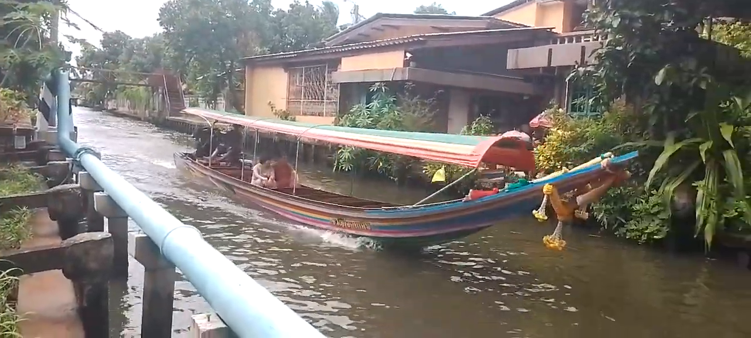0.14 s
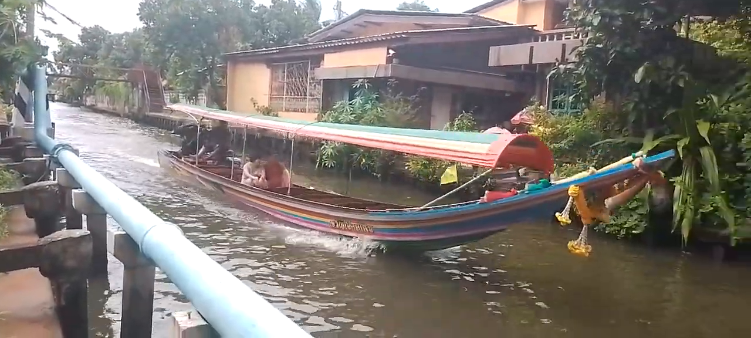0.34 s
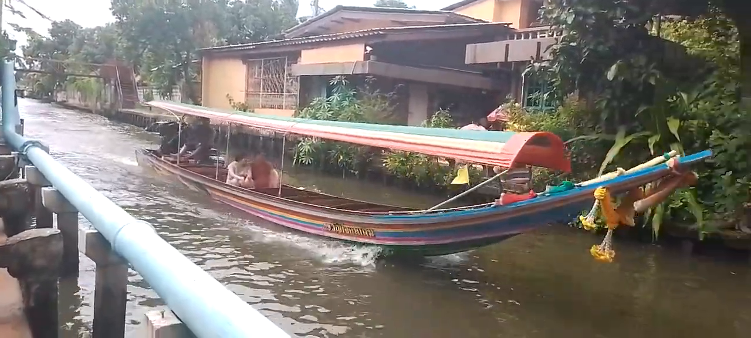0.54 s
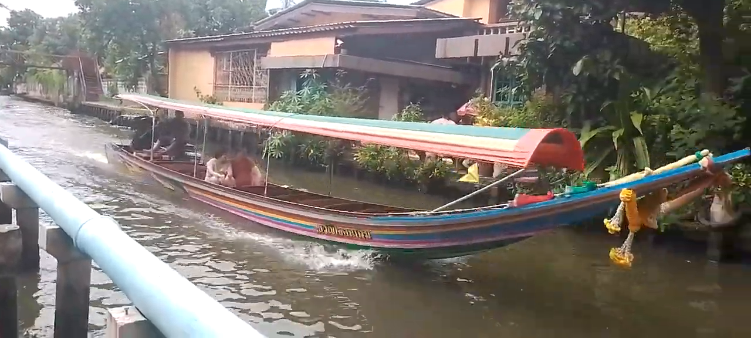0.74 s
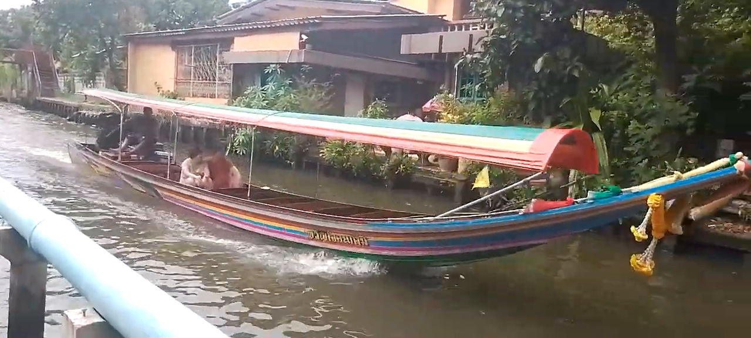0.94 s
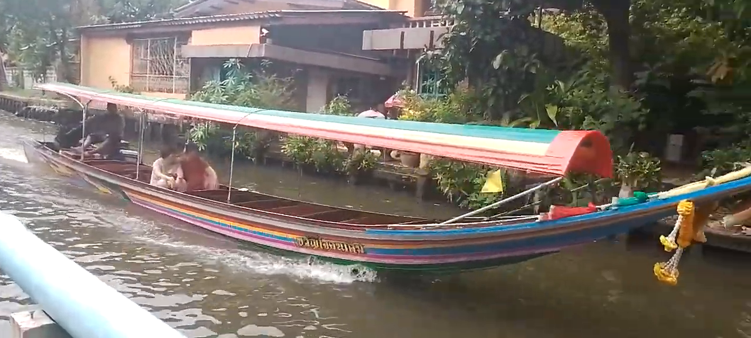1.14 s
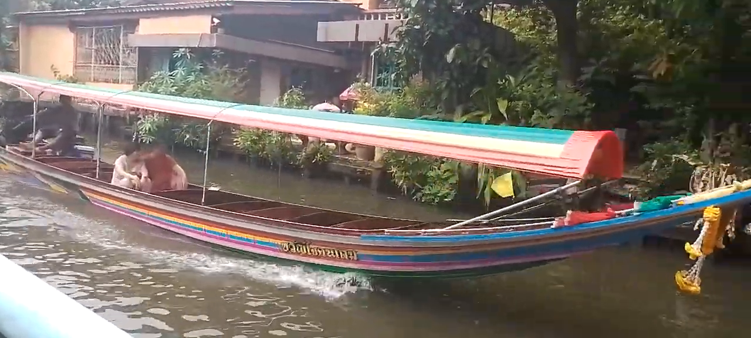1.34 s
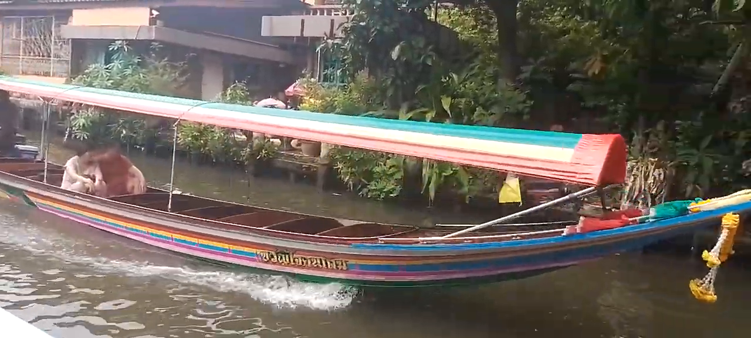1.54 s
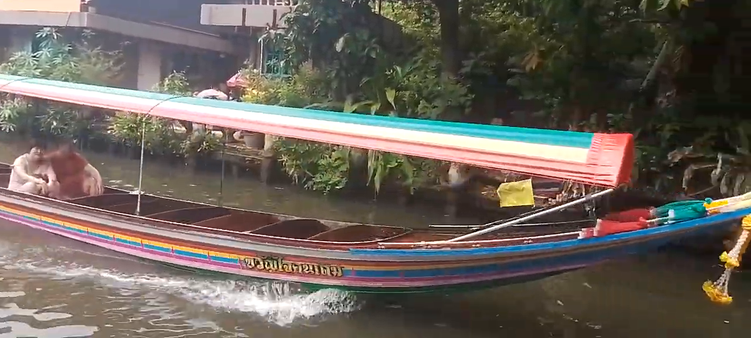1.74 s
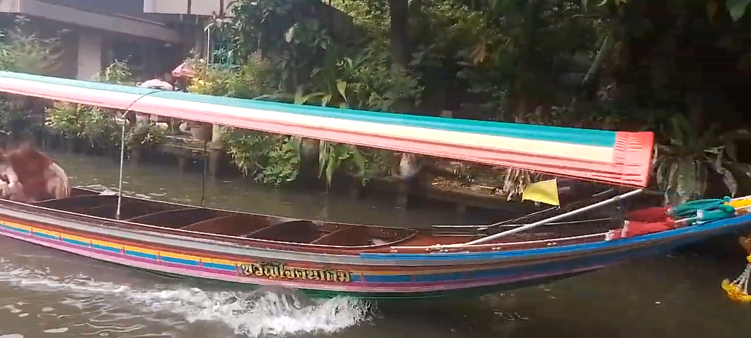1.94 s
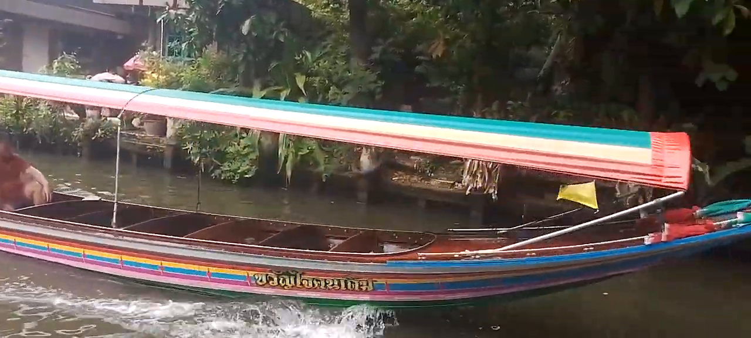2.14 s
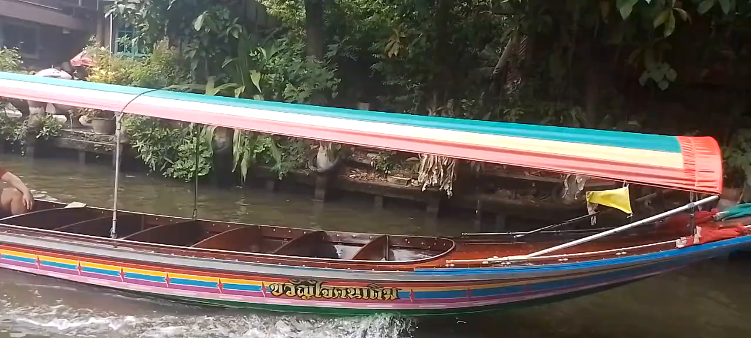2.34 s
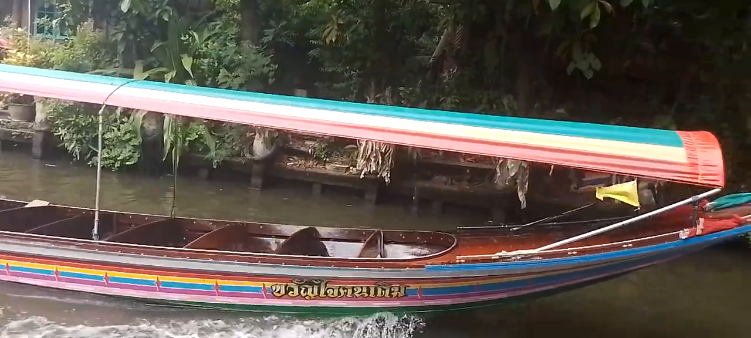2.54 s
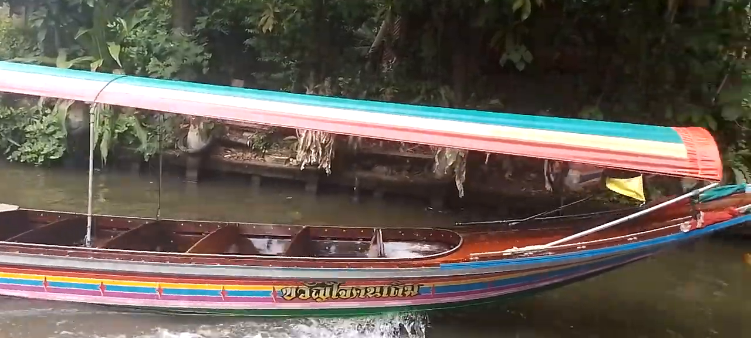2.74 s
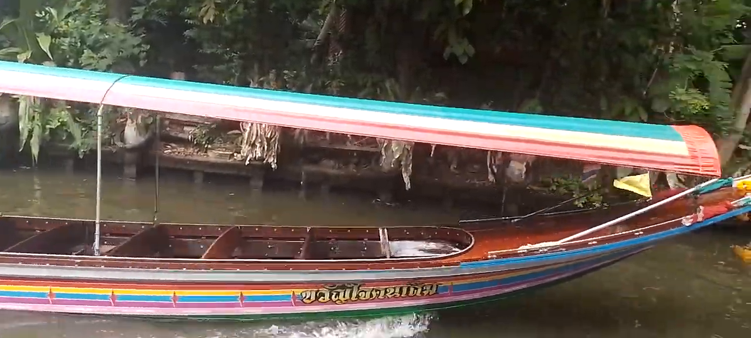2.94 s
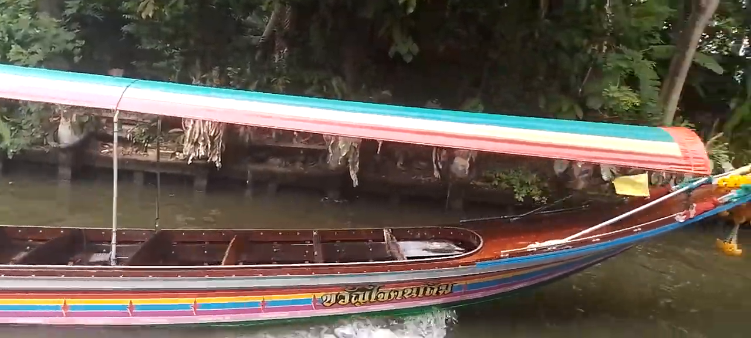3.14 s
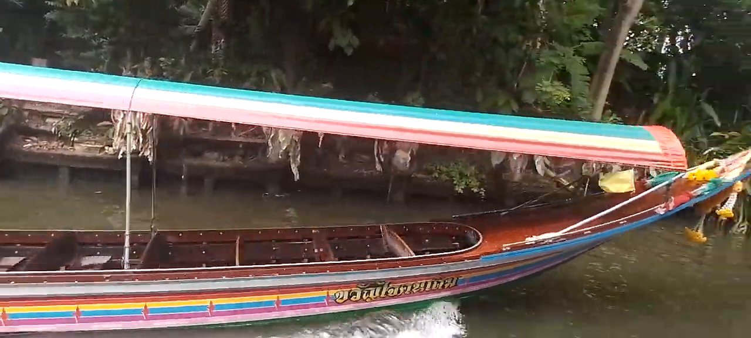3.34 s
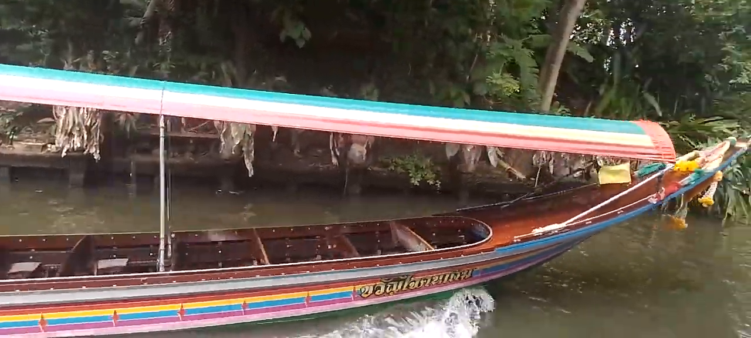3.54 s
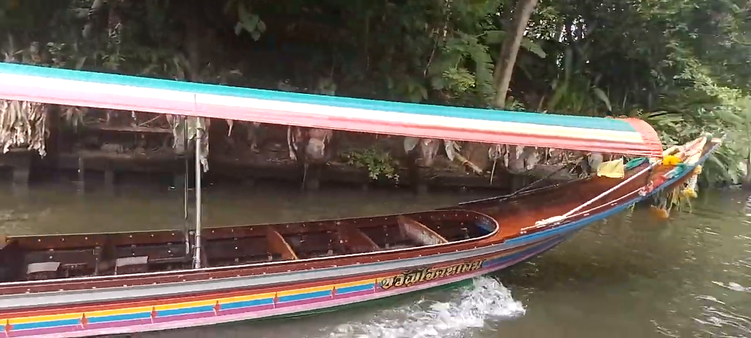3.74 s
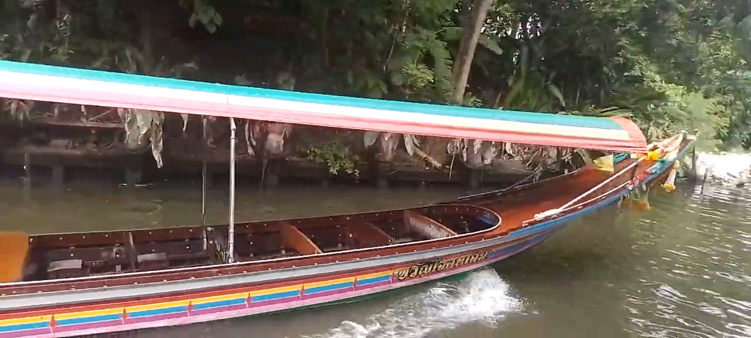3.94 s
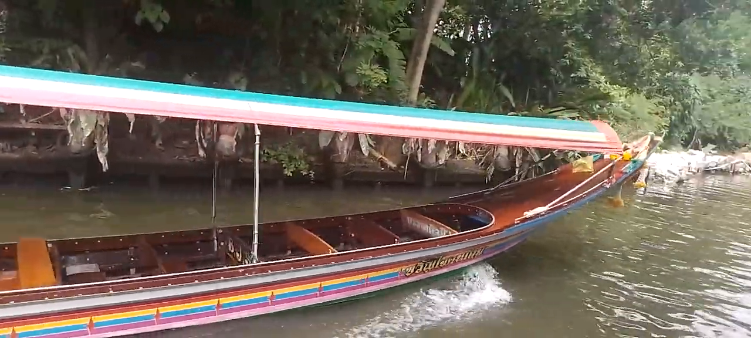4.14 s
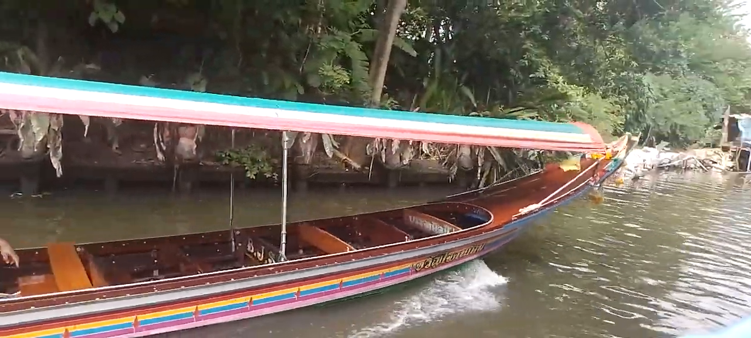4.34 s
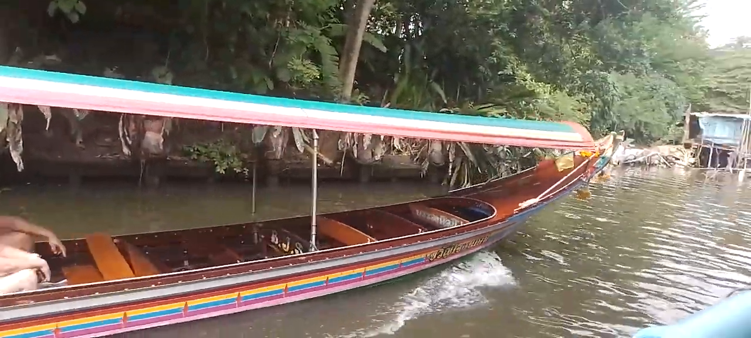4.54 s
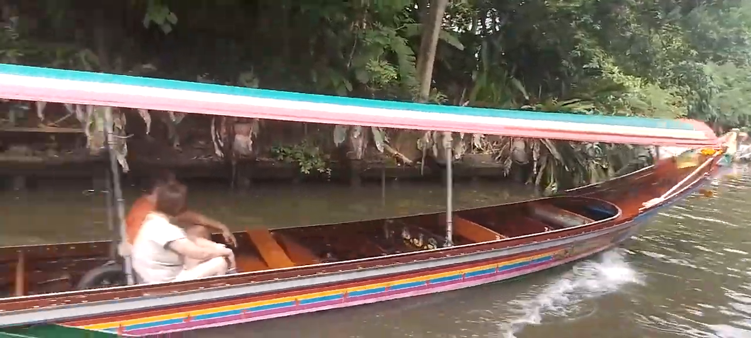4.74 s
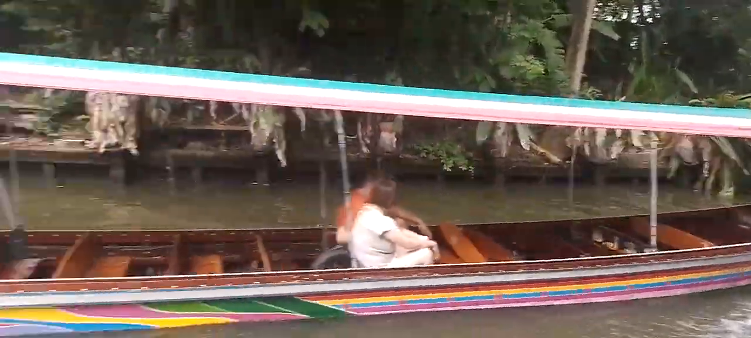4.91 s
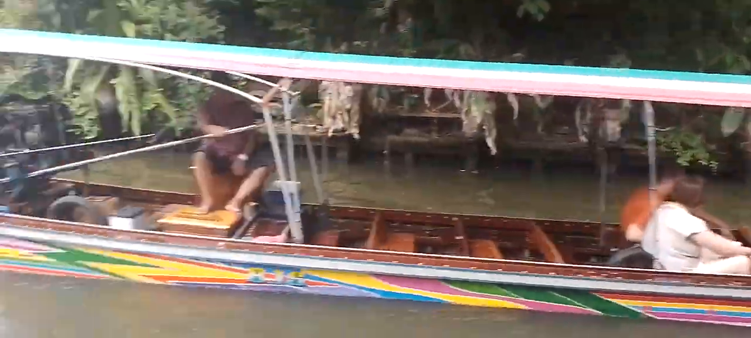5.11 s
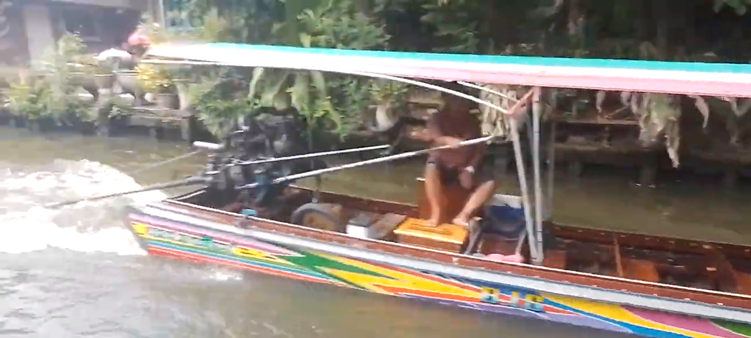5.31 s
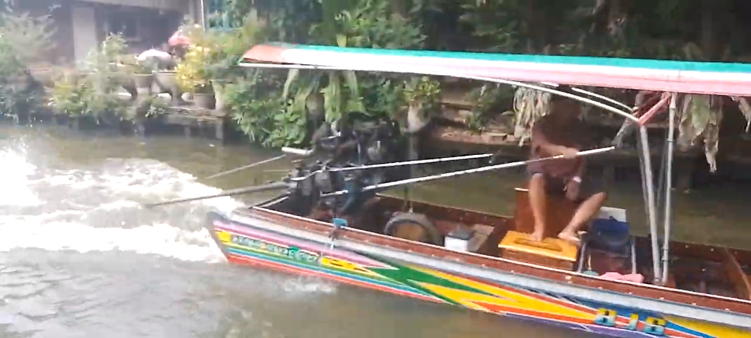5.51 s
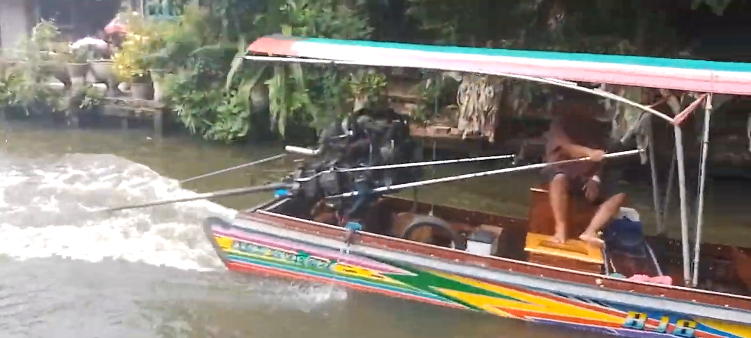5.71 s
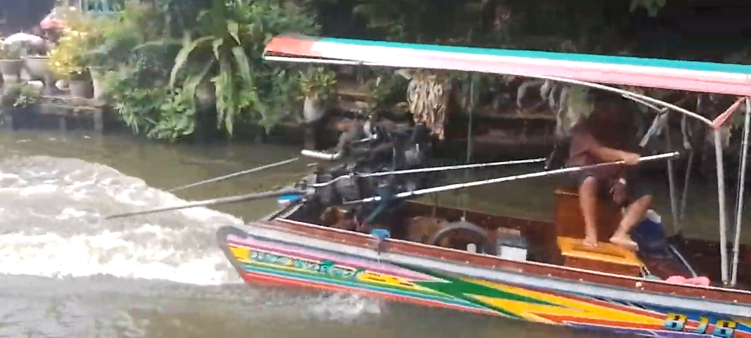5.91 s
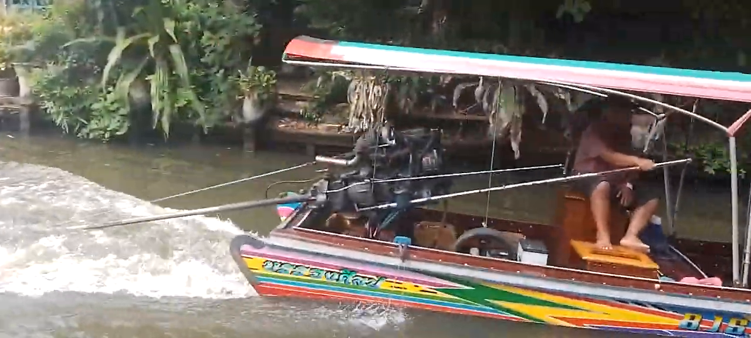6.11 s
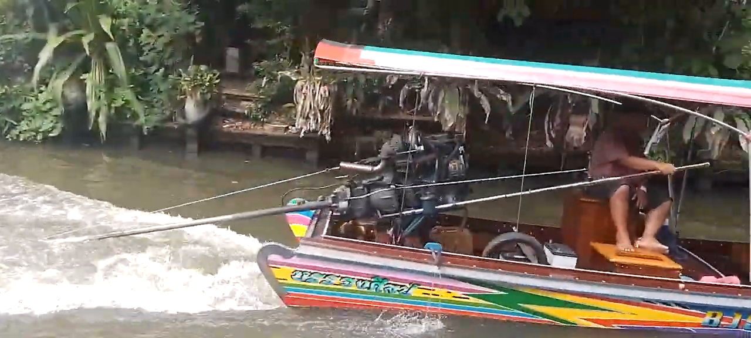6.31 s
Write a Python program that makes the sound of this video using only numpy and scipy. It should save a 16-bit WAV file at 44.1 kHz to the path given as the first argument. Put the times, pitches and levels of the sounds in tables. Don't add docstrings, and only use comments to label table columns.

```python
import sys
import numpy as np
from scipy import signal
from scipy.fft import rfft, irfft, next_fast_len
from scipy.io import wavfile
from scipy.ndimage import uniform_filter1d, map_coordinates

SR = 44100
rng = np.random.default_rng(int(sys.argv[2]) if len(sys.argv) > 2 else 0)


def amplitude_ratio(level_db):
    exponent = np.asarray(level_db, float) / 20
    return 10 ** exponent


def inscribe(sig):
    pcm = np.round(np.clip(np.atleast_2d(sig).T, -1, 1) * 32767)
    wavfile.write(sys.argv[1], SR, pcm.astype(np.int16))


N = 285327
TIME = np.arange(N) / SR

# frequency in Hz, width in Hz, gain in dB.
PIPE = [(225, 100, 1), (329, 100, 6.5), (388, 48, -5)]
# frequency in Hz, width in Hz, gain in dB.
SILENCER = [(841, 320, 8), (1004, 300, 8), (1158, 120, 4.5), (496, 110, -3)]
# frequency in Hz, width in Hz, gain at the first glimpse in dB,
# left and right gain while nearing in dB, left and right gain once alongside in dB.
PARTS = [(562, 240, 1.5, 2.5, 0.5, 0.5, -0.5), (874, 167, 1.5, 1, -10, 0, -5),
         (1282, 266, 0, 2.5, 6.5, 2.5, -0.5), (1628, 253, 2, 3, -0.5, -1.5, -1),
         (2220, 480, -1, 3.5, -0.5, -0.5, 2.5), (2894, 190, 1, 7.5, 6, 3.5, 2.5),
         (3750, 720, 0.5, 1, -2.5, 2.5, 0.5), (4445, 94, 5.5, 1.5, 0.5, -65, -2),
         (4880, 450, 1, -3, -7, -3, -11), (5310, 860, -0.5, -6, -7, -12, -14)]
# frequency in Hz, gain in dB.
LEFT_PORT = [(60, -91), (500, -24), (2500, -17.5), (4500, -17), (5850, -9), (6600, -4.5), (7500, -2.5),
             (7900, -7.5), (8500, -13), (9500, -21), (11000, -25), (15000, -20), (16000, -17.5)]
# frequency in Hz, gain in dB.
RIGHT_PORT = [(60, -64), (500, -17.5), (2500, -12), (4500, -10), (6500, -14.5), (8000, -6), (9300, -3.5),
              (10400, -1), (11300, -5.5), (12500, -9), (14000, -14), (16000, -21)]
# time in seconds, frequency in Hz,
# gain over the port colour in dB.
CREST = [(0, 6690, 6), (.5, 7160, 1.5), (1.0, 7090, 3), (1.5, 6910, 8.5), (1.9, 7230, 6), (2.6, 7020, 6),
         (3.2, 7320, 4.5), (3.8, 7390, 5.5), (4.3, 6970, 1.5), (6.47, 7120, 5)]
# time in seconds, delay of the left port in ms.
LAG = [(0, .14), (1.2, .2), (1.8, .45), (3, .52), (4.8, .55), (5.2, .1), (6, .02), (6.47, 0.)]
# time in seconds, left port over right for the engine in dB.
FACING = [(0, -5.5), (2, -3.5), (3.6, 1.5), (4.7, 3), (5.2, 3), (6.47, 0.5)]
# time in seconds, share 0-1.
ALONGSIDE = [(0, 0.), (4.85, 0.), (5.25, 1.), (6.47, 1.)]
# frequency in Hz, gain in dB.
CANAL = [(12, -45), (20, -50), (70, -9.5), (157, -21.5), (208, -0.5), (250, 1), (358, 6), (480, -2),
         (620, -19), (1060, -120)]
# delay in ms, gain as a factor.
BANKS = [(7, .8), (12.5, -.75), (19, .7), (25.5, -.55)]
# start in seconds, length in seconds, left delay in ms,
# right delay in ms, strength 0-1.
ECHOES = [
    (0, .6, 2.03, 1.9, .2),
    (0, 3, .6, 1.2, .09),
    (3.15, .95, .6, 1.155, .2),
    (4.93, .53, 2.52, 2.2, .5),
    (5.6, .9, 2.28, 2.04, .1),
]
# time in seconds, frequency in Hz, depth 0-1.
HULL_GAP = [(0, 2840, 0), (4.7, 2920, 0.68), (4.95, 2920, 0.6), (5.1, 2310, 0.65), (5.35, 2350, 0.65),
            (5.5, 2300, 0.16), (6.47, 2370, 0.51)]
# time in seconds, frequency in Hz, depth 0-1.
RING_GAP = [(0, 950, 0.5), (4.2, 970, 0.02), (4.4, 990, 0.7), (5.0, 980, 1), (5.2, 770, 0.5),
            (5.35, 740, 0.24), (6.47, 694, 0.33)]
# time in seconds, crank speed in turns/s.
REVS = [(0, 31.1), (.3, 32.1), (.65, 33.6), (1.1, 33.55), (1.4, 32.3), (1.7, 30.4), (2.0, 29.74),
        (2.65, 29.15), (3.3, 29.1), (3.6, 30), (4.0, 31.1), (4.8, 36.93), (5.2, 41.35), (5.5, 43.4),
        (5.8, 44.12), (6.1, 43.25), (6.47, 41.75)]
# time in seconds, load throb in dB, pipe mouth opening in dB.
EXHAUST = [(0, -74, -63), (.4, -65, -58.5), (1.15, -75, -72), (1.62, -70, -59), (1.74, -69, -41.5),
           (2.9, -79, -41), (3.2, -81, -46), (3.45, -71.5, -43), (3.62, -69, -49.5), (4.05, -66, -43),
           (4.22, -63, -47), (4.4, -64, -42), (4.7, -61, -50), (5.2, -52, -36), (5.6, -54.5, -43.5),
           (6.47, -57, -40)]
# start in seconds, length in seconds, level in dB.
SURGES = [
    (0.137, 0.099, -52),
    (0.966, 0.084, -53),
    (4.196, 0.12, -39),
    (4.414, 0.11, -39),
    (5.213, 0.12, -29),
    (5.691, 0.079, -34),
    (5.796, 0.13, -38),
    (6.067, 0.15, -31),
    (6.238, 0.072, -34),
    (6.37, 0.05, -50),
]
# time in seconds, then 8th, 9th, 10th, 11th and 13th order in dB.
HUM = [(0, -90, -98, -90, -90, -90), (1.6, -70, -78, -64, -72, -76), (1.77, -53, -52.5, -54, -62, -60),
       (1.88, -60, -70, -65, -53, -72), (2.19, -54, -60, -48, -61, -63), (2.38, -51, -66, -47, -60, -56),
       (2.47, -50, -62, -53, -52, -55), (2.55, -68, -61, -57, -43, -48), (2.72, -58, -60, -75, -55, -68),
       (2.8, -52.5, -50, -62, -47, -49), (2.96, -51.5, -51, -49, -48, -73),
       (3.12, -52, -57, -47, -46.5, -68), (3.2, -53, -49, -52, -59, -72), (3.46, -51, -62, -46.5, -63, -71),
       (3.82, -58, -59, -55, -52, -69), (4.02, -56, -50, -48, -69, -74), (4.3, -79, -77, -85, -80, -85),
       (6.47, -90, -90, -90, -90, -90)]
# start in seconds, peak in dB, frequency in Hz.
POPS = [(5.2, -28, 351), (5.223, -22, 347), (5.254, -27, 313), (5.297, -22.5, 272), (5.665, -30, 264),
        (5.688, -31, 315), (5.713, -18, 264), (5.756, -22, 281), (5.779, -32, 313), (5.843, -22, 354),
        (5.891, -19, 254), (6.024, -24, 316), (6.075, -15, 282), (6.097, -11, 304), (6.12, -30, 343),
        (6.163, -15.5, 280), (6.212, -22, 335), (6.257, -22, 438), (6.257, -18, 270), (6.329, -29, 260),
        (6.379, -23, 317), (6.425, -22.5, 299)]
# time in seconds, left and right level at the port peaks in dB per Hz.
WAVES = [(0, -71, -76.5), (.2, -66.5, -74.5), (.9, -65.5, -72), (1.5, -64.5, -71.5), (2.1, -61.5, -71),
         (2.8, -61, -70), (3.5, -65.5, -68.5), (3.9, -65.5, -65.5), (4.25, -61, -61), (4.45, -58.5, -59.5),
         (4.84, -58, -58.5), (4.92, -46.5, -52.5), (5.45, -52.5, -59.5), (5.7, -57, -63.5),
         (6.15, -57, -63), (6.47, -51.5, -57.5)]
# start in seconds, length in seconds, left and right level in dB per Hz.
GUSHES = [
    (4.919, 0.023, -53.5, -53),
    (5.027, 0.024, -40.5, -54),
    (5.074, 0.071, -46, -53),
    (5.166, 0.15, -47.5, -56),
    (5.267, 0.085, -51, -55.5),
    (5.368, 0.11, -47.5, -56),
    (5.548, 0.0052, -52, -74),
]
# time in seconds, gain in dB.
BREADTH = [(0, 4.5), (1.5, 2.5), (2.8, 0), (3.4, 1), (4.75, -4), (4.88, -7.5), (5.0, -2), (5.35, -1),
           (5.7, 5.5), (6.1, 7), (6.47, 3.5)]
# start in seconds, peak in dB, left over right in dB.
SPLASHES = [(0.1413, -20, 19), (0.2034, -34, 11.5), (0.5726, -22, 14), (0.6619, -34, 10.5),
            (1.275, -38, 18), (1.377, -20.5, 10.5), (1.435, -26, 14), (1.4975, -23, 14.5),
            (1.8342, -30, 13.5), (1.9584, -27, 15.0), (2.1316, -34, 15), (2.267, -21, 22),
            (2.3366, -30, 11), (2.3685, -20, 15.5), (2.5716, -24, 14.0), (2.641, -18, 16),
            (2.9841, -23, 13.5), (3.155, -22, 13), (3.2216, -23, -4), (3.422, -23, 3), (3.4979, -32, 4.5),
            (4.0228, -18, -2), (4.2097, -19.5, -10), (4.3595, -36, -3.5), (4.391, -24, -8),
            (4.6204, -28, 4), (5.0747, -13, 9), (5.1241, -7, 10), (5.174, -31, 6), (5.2174, -7, 6),
            (5.2663, -8, 2), (5.2915, -6, 5), (5.3617, -5.5, 7), (5.4123, -1, 12), (5.4533, -6, 5),
            (5.5458, -17, 6), (6.1135, -11.5, 13)]
# start in seconds, peak in dB, frequency in Hz, decay in seconds.
SLAPS = [
    (2.435, -51, 1720, .012),
    (2.502, -45, 1780, .012),
    (2.52, -53, 1700, .03),
    (2.638, -46, 1790, .011),
    (2.774, -50, 1820, .01),
    (2.795, -44.5, 1690, 0.04),
    (2.922, -49, 1670, .02),
    (3.0507, -47.5, 1780, .014),
    (3.1645, -53, 1690, .015),
]
# time in seconds, left and right share per kHz.
CHOKE = [(0, 0, 0), (4.35, 0, 0), (4.5, .03, .3), (4.75, .03, 1.5), (4.86, .1, 2), (4.93, .55, 3),
         (5.18, .8, 3), (5.22, .08, .2), (5.5, .08, .25), (5.62, .08, 2), (5.84, .05, 1.5), (5.9, .05, .2),
         (6.08, .05, .2), (6.15, .08, 1.5), (6.47, .08, 1)]

BOAT_M_PER_S, PASS_M, PASS_S = 4.54, 3.69, 5.913
HUM_S, HUM_FOR_S = 1.75, 2.3
SURGE_RISE_S, SURGE_FALL_S = 0.03, 0.015
GUSH_RISE_S, GUSH_FALL_S = 0.0048, 0.0069
ECHO_FADE_S = 0.1


def evened(x):
    return x / np.sqrt(np.mean(x ** 2) + 1e-20)


def decibels(power):
    return 10 * np.log10(abs(power) + 1e-14)


def columns(rows):
    s, *values = np.transpose(rows)
    return np.array([np.interp(TIME, s, v) for v in values])


def hold(start_s, length_s, rise_s, fall_s):
    early_s = np.maximum(start_s - TIME, 0)
    late_s = np.maximum(TIME - start_s - length_s, 0)
    return np.exp(-(early_s / rise_s) ** 2 - late_s / fall_s)


def drift(seconds):
    size = max(round(seconds * SR), 2)
    return evened(uniform_filter1d(uniform_filter1d(rng.standard_normal(N), size), size))


def colour(x, points):
    f, db = np.transpose(points)
    size = next_fast_len(N)
    hz = np.fft.rfftfreq(size, 1 / SR)
    gain_db = np.interp(np.log(hz + 1), np.log(f + 1), db)
    return irfft(rfft(x, size) * amplitude_ratio(gain_db), size)[:N]


def ring(x, hz, width_hz):
    b, a = signal.iirpeak(hz, hz / width_hz, SR)
    return signal.lfilter(b, a, signal.lfilter(b, a, x))


def notch(x, hz, width_hz, depth):
    turn = np.exp(2j * np.pi * np.cumsum(hz) / SR)
    r = np.exp(-np.pi * width_hz / SR)
    band = 2 * (turn * signal.lfilter([1 - r], [1, -r], x / turn)).real
    return x - np.clip(depth, 0, 1) * band


def later(x, ms):
    return map_coordinates(x, [np.round(np.arange(N) - ms * SR / 1000)], order=1, mode="nearest")


def ports(x, share=1):
    return np.array([later(x, share * columns(LAG)[0]), x])


def near_db():
    return -10 * np.log10(1 + (BOAT_M_PER_S * (TIME - PASS_S) / PASS_M) ** 2)


def astern_db(db):
    return db * columns(ALONGSIDE)[0] ** 3 + 5.5 * np.maximum(TIME - PASS_S, 0)


def clear_db(db):
    return db * hold(4.415, 0.19, rise_s=0.047, fall_s=0.26)


def canal():
    a, b = (evened(colour(rng.standard_normal(N), CANAL)) for _ in range(2))
    level_db = -38.5 + 1.32 * near_db() + astern_db(0.5)
    return amplitude_ratio(level_db) * (ports(a, 0.19) + 0.18 * np.array([b, -b]))


def slaps():
    out, t = np.zeros(N), np.arange(5000) / SR
    for s, db, hz, ring_s in SLAPS:
        burst = np.exp(-t / ring_s) * rng.standard_normal(len(t))
        knock = ring(burst, hz, 260)
        out[round(s * SR):][:len(t)] += amplitude_ratio(db + 11.5) * knock / abs(knock).max()
    return ports(out) * amplitude_ratio([[2], [-5]])


def splashes():
    level, t = np.zeros((2, N)), np.arange(4000) / SR
    t60_s, rise_s = 0.033, 0.0015
    for s, db, pan_db in SPLASHES:
        port_db = db - 6 + np.array([[pan_db / 4], [-3 * pan_db / 4]])
        burst = amplitude_ratio(port_db - 60 * t / t60_s) * np.minimum(t / rise_s, 1)
        level[:, round(s * SR):][:, :len(t)] += burst
    a, b = rng.standard_normal((2, N))
    left = evened(colour(colour(a, LEFT_PORT), LEFT_PORT))
    right = evened(colour(b, RIGHT_PORT))
    return level * np.array([left, right])


def spray_level():
    power = amplitude_ratio(columns(WAVES)) ** 2
    for s, length_s, *db in GUSHES:
        power += (amplitude_ratio(db)[:, None] * hold(s, length_s, GUSH_RISE_S, GUSH_FALL_S)) ** 2
    return np.sqrt(power)


def spray(turns, drops_per_s, size_db, tick, same):
    hits = (rng.random(N) < drops_per_s / SR) * amplitude_ratio(size_db * np.minimum(rng.exponential(1, N), 4))
    tick_luck = amplitude_ratio(2.9 * rng.standard_normal(N).clip(-2, 1.5))
    hits += tick * np.diff(np.floor(turns + 0.27), prepend=0) * tick_luck
    drops = signal.lfilter([1], [1, -np.exp(-1 / (0.006 * SR))], hits)
    gusts = amplitude_ratio(0.8 * np.array([drift(0.014), drift(0.019)]) + 0.73 * drift(0.1))
    a, b = rng.standard_normal((2, N))
    mixed = same * ports(a) + np.sqrt(1 - same ** 2) * np.array([b, b[::-1]])
    noise = evened(gusts * (1 + 0.089 * drops) * mixed)
    hiss = np.array([colour(noise[0], LEFT_PORT), colour(noise[1], RIGHT_PORT)])

    crest_hz, crest_db = columns(CREST) + [[110], [1.2]] * np.array([drift(.12), drift(.06)])
    crest = hiss[0] - notch(hiss[0], crest_hz, 140, 1)
    hiss[0] += (amplitude_ratio(crest_db) - 1) * crest

    body_db = columns(BREADTH)[0]
    fizz_db = np.maximum(body_db, -15)
    body = signal.sosfiltfilt(signal.butter(3, 6300, fs=SR, output="sos"), hiss)
    fizz = signal.sosfiltfilt(signal.butter(3, 12300, "high", fs=SR, output="sos"), hiss)
    hiss += (amplitude_ratio(body_db) - 1) * body + (amplitude_ratio(fizz_db) - 1) * fizz

    band = signal.butter(2, [8800, 1.5 * 8800], "band", fs=SR, output="sos")
    hiss[0] += amplitude_ratio(1) * hold(5.2, .27, .22, .05) * signal.sosfilt(band, hiss[0])
    return spray_level() * np.sqrt(SR / 2) * hiss


def reflected(x):
    echoes, power = np.zeros_like(x), 1
    for s, length_s, left_ms, right_ms, strength in ECHOES:
        share = strength * hold(s, length_s, ECHO_FADE_S, ECHO_FADE_S)
        echoes = echoes + share * np.array([later(x[0], left_ms), later(x[1], right_ms)])
        power = power + share ** 2
    hull_hz, hull_depth = columns(HULL_GAP)
    x = notch((x + echoes) / np.sqrt(power), hull_hz, 340, hull_depth)
    canopy_depth = .85 * (0.74 + 0.38 * drift(0.051)) * hold(4.05, 1.2, ECHO_FADE_S, ECHO_FADE_S)
    x = notch(x, 2700 + 0 * TIME, 110, canopy_depth)
    return notch(x, 3170 + 0 * TIME, 140, 0.47 * columns(ALONGSIDE)[0])


def rattle():
    buzz = evened(ring(rng.standard_normal(N), 4300, 360))
    level_db = -52.5 + 5 * np.tanh(drift(0.04))
    level = amplitude_ratio(level_db) * hold(0.44, 2.4, rise_s=0.5, fall_s=0.5)
    return ports(level * buzz) * amplitude_ratio([[2], [-4]])


def block(turns, knock, same):
    beat = (1 + knock * np.exp(-(2 * turns % 1) / 0.036)) * amplitude_ratio(2.33 * drift(0.0047))
    shared = ports(rng.standard_normal(N) * beat)
    own = beat * rng.standard_normal((2, N))
    noise = evened(same * shared + np.sqrt(1 - min(same, 1) ** 2) * own)
    flank, rung = columns(ALONGSIDE)[0], np.zeros((2, N))
    glimpse = hold(4.1, 0.31, rise_s=0.1, fall_s=0.1)
    for hz, width_hz, glimpse_db, *db in PARTS:
        nearing_db, passing_db = np.reshape(db, (2, 2, 1))
        part_db = glimpse_db * glimpse + (1 - flank) * nearing_db + flank * passing_db
        rung += amplitude_ratio(part_db) * ring(noise, hz, 1.29 * width_hz)
    level_db = -63.5 + near_db() + clear_db(2) + columns(FACING) * [[1], [0]]
    return amplitude_ratio(level_db) * np.sqrt(SR / 2) * rung


def pops():
    out, t = np.zeros(N), np.arange(4000) / SR
    t60_s, rise_s = 0.061, 0.0076
    silencer_hz = SILENCER[1][0] * .93
    for (s, db, hz), phase in zip(POPS, rng.random((len(POPS), 2))):
        tones = np.sin(2 * np.pi * (hz * t + phase[0]))
        tones += amplitude_ratio(-7.5) * np.sin(2 * np.pi * (silencer_hz * t + phase[1]))
        pop = amplitude_ratio(db - 2.5 - 60 * t / t60_s) * (1 - np.exp(-(t / rise_s) ** 2)) * 2.08 * tones
        part = out[round(s * SR):][:len(t)]
        part += pop[:len(part)]
    return ports(out, .5)


def banks(x):
    echoes = np.zeros_like(x)
    for ms, gain in BANKS:
        echoes += gain * np.pad(x, ((0, 0), (round(ms * SR / 1000), 0)))[:, :N]
    far = 1 - .6 * columns(ALONGSIDE)[0]
    return (x + far * echoes) / np.sqrt(1 + 2 * far ** 2)


def pipe_level(mouth_db):
    steady = amplitude_ratio(mouth_db) * (1 - 0.42 * columns(ALONGSIDE)[0])
    power = steady ** 2
    for s, length_s, db in SURGES:
        power += (amplitude_ratio(db) * hold(s, length_s, SURGE_RISE_S, SURGE_FALL_S)) ** 2
    return decibels(power)


def engine_orders(turns):
    second_db, mouth_db = columns(EXHAUST)
    third_db = mouth_db - 19 + clear_db(-5) - 3 * columns(ALONGSIDE)[0]
    angle = 2 * np.pi * turns
    out = amplitude_ratio(second_db - 16) * np.sin(angle)
    out += amplitude_ratio(second_db) * np.sin(2 * angle)
    out += amplitude_ratio(third_db) * np.sin(3 * angle + 1)
    out += amplitude_ratio(third_db - 12) * np.sin(4 * angle)
    out += amplitude_ratio(third_db - 13) * np.sin(5 * angle)
    out += amplitude_ratio(mouth_db - 27) * evened(ring(rng.standard_normal(N), 132, 55))
    wander_turns = 0.045 * drift(0.11)
    for order, db in zip((8, 9, 10, 11, 13), columns(HUM)):
        out += amplitude_ratio(db) * np.sin(2 * np.pi * (order * (turns - .2) + wander_turns))
    return out


def ringing(drive, modes):
    out = np.zeros(N)
    for k, (hz, width_hz, db) in enumerate(modes):
        out += (-1) ** k * amplitude_ratio(db) * ring(drive, hz, 0.76 * width_hz)
    return evened(out)


def exhaust(turns, uneven_db, rough, weak):
    mouth_db = columns(EXHAUST)[1]
    pipe_db = pipe_level(mouth_db) - 1.5 - 4 * hold(HUM_S, HUM_FOR_S, 0.066, 0.074)
    silencer_db = -42.5 + 0.38 * near_db() + astern_db(6.5) + clear_db(3)
    silencer_db += .1 * (pipe_db - mouth_db) + 1.6 * drift(.025)
    orders = engine_orders(turns)

    firing = np.floor(2 * turns).astype(int)
    strength = amplitude_ratio(uneven_db * rng.standard_normal(1000))[firing] * np.where(firing % 2, weak, 1)
    puffs = evened(np.diff(firing, prepend=0) * strength)
    swell = amplitude_ratio(1.5 * drift(0.0077)) * (.5 + np.exp(-(turns % 1) / 1.05))
    gust = evened(swell * rng.standard_normal(N))
    steep = signal.butter(6, 226, "high", fs=SR, output="sos")
    puffs, gust = signal.sosfilt(steep, [puffs, gust])

    pipe = amplitude_ratio(pipe_db) * ringing((1 - rough) * puffs + rough * gust, PIPE)
    silencer = amplitude_ratio(silencer_db) * ringing((1 - .8) * puffs + .8 * gust, SILENCER)
    return banks(ports(pipe, 0.51)) + ports(silencer, 0.6) + ports(np.sqrt(2) * orders)


def scene():
    turns = np.cumsum(columns(REVS)[0]) / SR
    turns += 1 - turns[round(3.052 * SR)] % 1
    rough = .3 + .25 * np.maximum(columns(ALONGSIDE)[0], clear_db(1)) + .45 * hold(HUM_S, HUM_FOR_S, .1, .1)
    low = exhaust(turns, uneven_db=1.6, rough=rough, weak=.08)
    high = block(turns, knock=0.42, same=0.72)
    high += spray(turns, drops_per_s=110, size_db=0.0, tick=4.9, same=0.15)
    gap_hz, gap_depth = columns(RING_GAP)
    engine = notch(low + reflected(high), gap_hz, 138, gap_depth)
    return engine + slaps() + canal() + rattle() + pops() + splashes()


def gated(z, hz):
    threshold_db, depth_db, knee_db = -70, 16, 1.25
    power = uniform_filter1d(uniform_filter1d(2 * abs(z) ** 2, size=56, axis=2), size=3, axis=1)
    shut = 1 / (1.5 + np.exp(np.clip((decibels(power) - threshold_db) / knee_db, -30, 30)))
    shut *= np.clip((hz[:, None] - 400) / 120, 0, 1)
    return z * amplitude_ratio(-depth_db * shut)


def hollowed(z, hz):
    block_of = np.arange(z.shape[2]) // 8
    power = uniform_filter1d(abs(z) ** 2, size=14, axis=2)[:, :, block_of * 8]
    around = uniform_filter1d(power, size=21, axis=1) + 1e-14
    depth_db = decibels(uniform_filter1d(power, size=2, axis=1) / around)
    luck_db = 2.8 * rng.standard_normal((z.shape[2] // 8 + 1, len(hz))).T[:, block_of]
    inside = (hz[:, None] > 1200) & (hz[:, None] < 15400)
    return z * ~((depth_db + luck_db < -9) & inside)


def starved(z, hz):
    power = uniform_filter1d(uniform_filter1d(2 * abs(z) ** 2, size=16, axis=2), size=4, axis=1)
    level_db = decibels(power)
    level_db = level_db[:, np.arange(z.shape[1]) // 4 * 4][:, :, np.arange(z.shape[2]) // 8 * 8]
    slope_db = 5 * hz[:, None] / 1000
    mask_db = np.maximum.accumulate(level_db + slope_db, axis=1) - slope_db - 6.5
    peak_db = level_db[:, hz > 6000].max(axis=1)
    busy = (peak_db.min(axis=0) > -61) & (peak_db[0] < -52.5)
    return z * ~((level_db < mask_db) & busy & (hz[:, None] > 9000))


def choked(z, hz):
    band, frame = np.arange(len(hz)) // 2, np.arange(z.shape[2]) // 16
    luck = rng.random((frame[-1] + 1, band[-1] + 1)).T[band][:, frame]
    per_khz = columns(CHOKE)[:, np.minimum(frame * 16 * 128, N - 1)]
    share = (per_khz[:, None] * (hz[:, None] - 12900) / 1000).clip(0, .88)
    return z * (luck >= share)


def top_cut(x):
    return signal.sosfilt(signal.butter(12, 15720, fs=SR, output="sos"), x)


def record(dry):
    ceiling = .9
    limited = ceiling * np.tanh(dry / ceiling)
    hz, _, z = signal.stft(limited, SR, nperseg=512, noverlap=384, scaling="psd")
    z = hollowed(gated(z, hz), hz)
    z = choked(starved(z, hz), hz)
    mix = signal.istft(z, SR, nperseg=512, noverlap=384, scaling="psd")[1][:, :N]
    return top_cut(mix)


dry = scene()
out = record(dry)
inscribe(out)
```